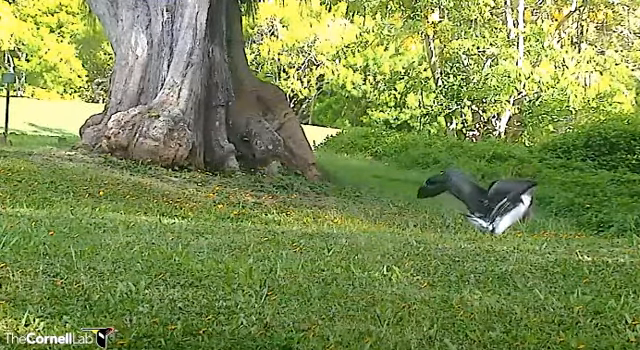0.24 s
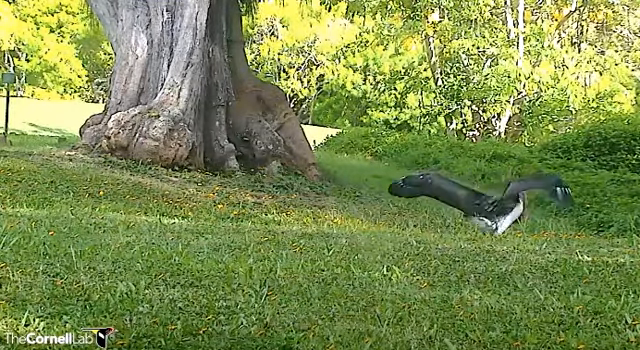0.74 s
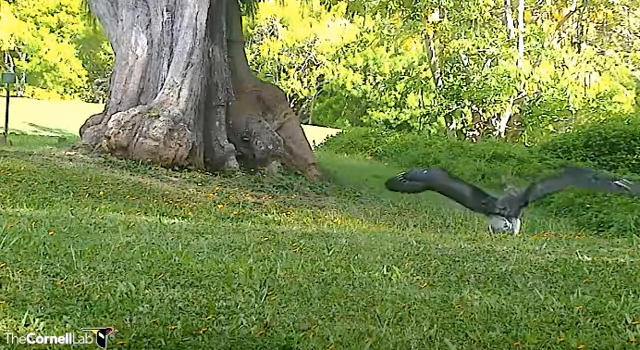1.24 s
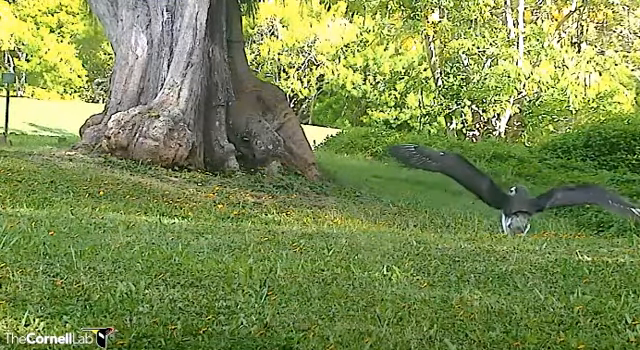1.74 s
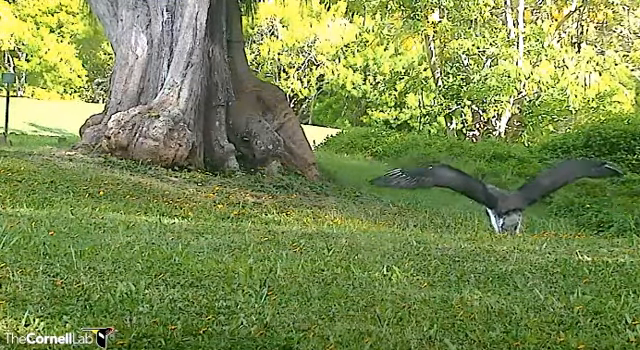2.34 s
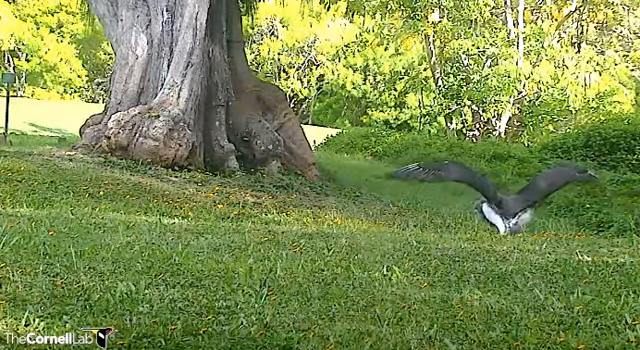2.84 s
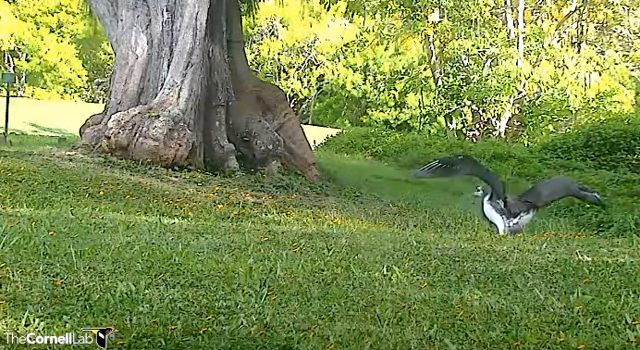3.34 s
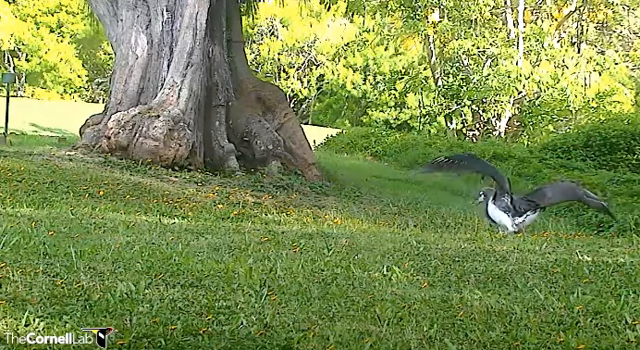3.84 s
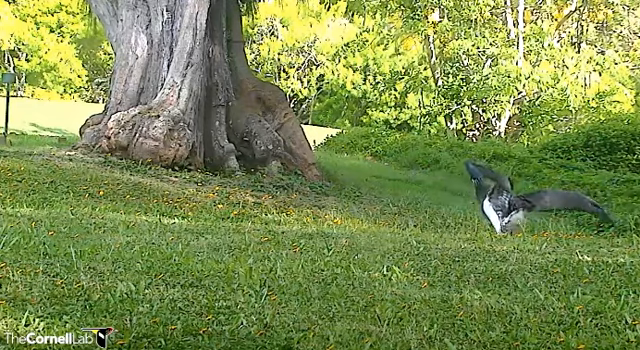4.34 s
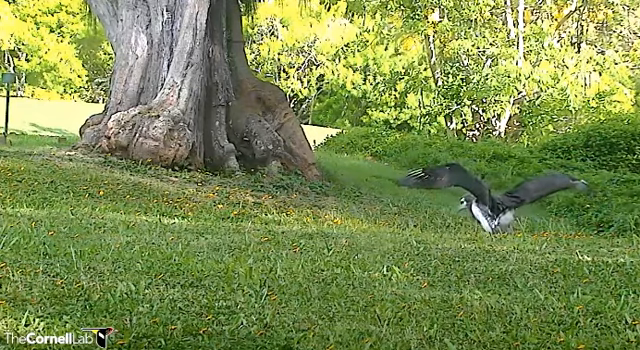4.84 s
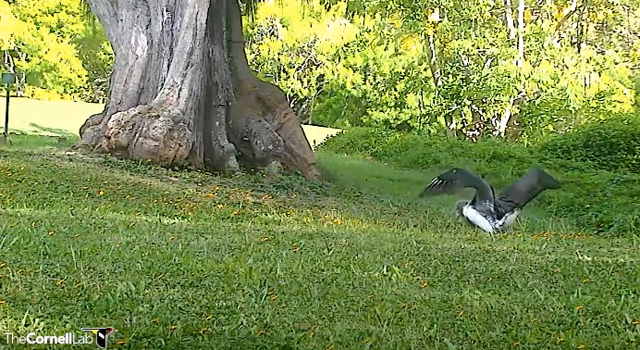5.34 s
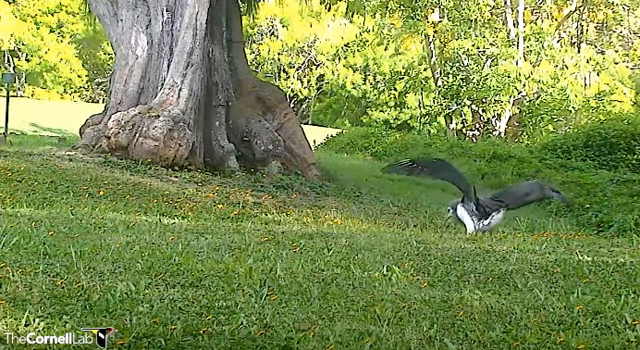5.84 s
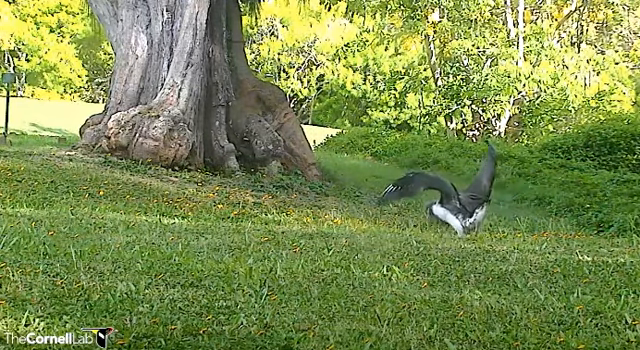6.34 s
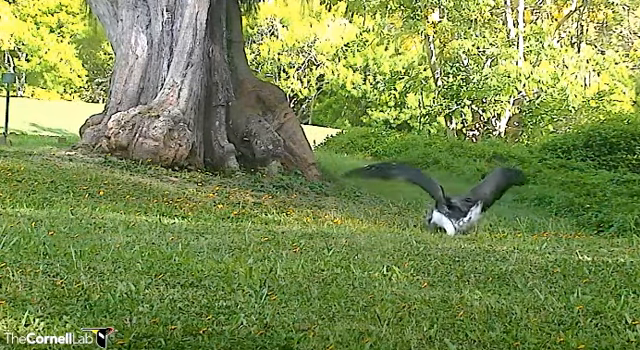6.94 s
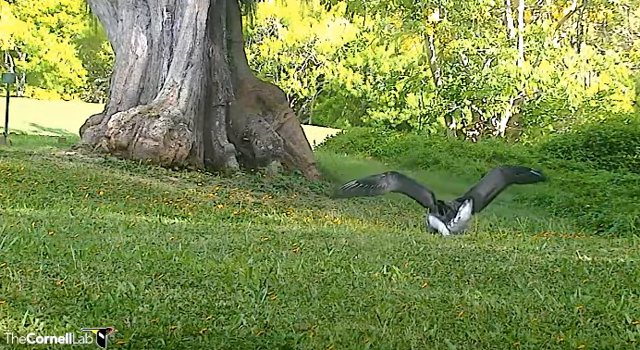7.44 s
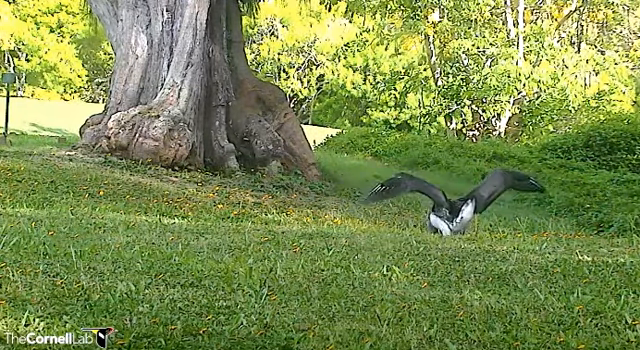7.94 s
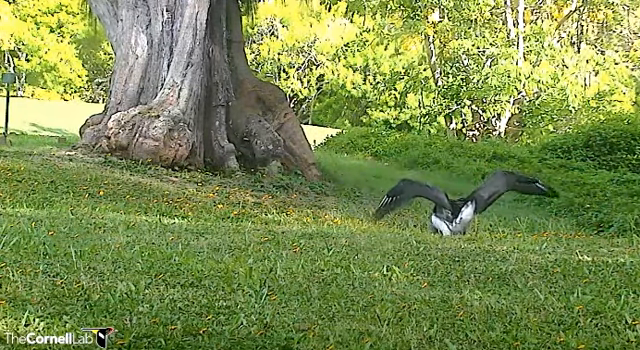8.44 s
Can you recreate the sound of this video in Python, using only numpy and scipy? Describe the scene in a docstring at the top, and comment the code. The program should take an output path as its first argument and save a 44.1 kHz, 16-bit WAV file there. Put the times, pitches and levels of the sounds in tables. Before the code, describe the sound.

A young seabird's wings swish and thump softly on a lawn amid constant insect-like hiss, framed by two short, sinking trilled hoots.

```python
"""Over a steady outdoor hiss and a faint low hum, a bird hoots at once and again near the end: each call
is a short broken note (gliding tones), then a long trill (a throbbing tone) that sinks at the end.
In between, a young albatross exercises its wings on a lawn: soft swishes and rumbles (swelling noise)
and a few low thumps (brief bell-shaped tone bursts), with thin raspy peeps (roughened gliding tones)."""
import sys
import numpy as np
from scipy import signal
from scipy.fft import rfft, irfft
from scipy.io import wavfile
from scipy.ndimage import uniform_filter1d

SR = 44100
rng = np.random.default_rng(int(sys.argv[2]) if len(sys.argv) > 2 else 0)


def to_wav(sig):
    """Store sig (one row per channel, or 1-D mono) as 16-bit WAV at the path in sys.argv[1].

    Samples outside -1..1 are clipped; the rate is SR.
    """
    pcm = np.clip(np.atleast_2d(sig), -1, 1) * 32767
    pcm = np.round(pcm).astype(np.int16)
    wavfile.write(sys.argv[1], SR, pcm.T)  # frames by channels


N = 383229
TIME_S = np.arange(N) / SR

# calls: hoot_crest_s, hoot_level_db, trill_start_s, trill_level_db, push_after_trill_start_s
CALLS = [(.213, -58, .465, -68, 0.23), (6.643, -55.5, 6.842, -71.5, 0.25)]
# hoot steps up, breaks to its crest, drops back:
# start_from_crest_s, length_s, first_hz, last_hz, level_re_crest_db, roughness_0_to_1
HOOT_NOTES = [(-.08, .06, 730, 835, -7, .4), (-.027, .044, 870, 838, -0.5, .2),
              (.006, .044, 764, 815, -7.5, .35)]

# trill: held pitch, one push, then sinking and fading
TRILL_S, TRILL_HZ, PITCH_WAVER_HZ = 0.517, 749, 6.9
SINK_AFTER_S, SINK_HZ_PER_S, FADE_DB_PER_S = 0.315, 760, 41
TRILL_ATTACK_S, TRILL_RELEASE_S = 0.035, 0.064
PUSH_DB, PUSH_HALF_S = 5.5, 0.058
# throbs ring the throat; jitter is in throb periods
THROB_PER_S, THROB_JITTER, THROB_HALF_S = 54, 0.28, 0.0037
THROB_DB, THROB_SPREAD_DB, THROAT_HZ = 5.5, 3, 800

# raspy whistles, level before taper and quiver:
# start_s, length_s, first_hz, last_hz, level_db, roughness_0_to_1
PEEP_NOTES = [(2.480, 0.022, 3230, 3420, -45, .4), (3.073, .027, 3350, 3230, -37.5, 0.2),
              (4.170, 0.051, 2900, 2880, -46.5, .54), (4.2, 0.062, 3500, 3350, -49.5, 0.65),
              (5.375, 0.05, 2980, 3030, -43.5, .56), (5.412, 0.044, 3170, 3360, -41.5, 0.54),
              (5.51, 0.091, 2637, 2760, -43, .45), (5.795, 0.057, 2880, 2960, -47, 0.2),
              (5.912, 0.092, 2607, 2572, -42, 0.37), (5.942, 0.017, 2960, 2920, -42, 0.4),
              (6.268, 0.029, 2960, 2940, -49, 0.2), (6.385, 0.096, 2556, 2517, -43.5, 0.37)]

# feather swishes: middle_s, half_length_s, level_db
SWISH_SWELLS = [(2.56, 0.084, -52), (2.9, 0.073, -54.5), (3.13, 0.12, -54), (3.58, 0.16, -53),
                (3.94, 0.035, -52), (4.24, 0.086, -56.5), (4.48, 0.032, -50.5), (5.41, 0.076, -53),
                (5.58, 0.062, -53.5), (5.83, 0.15, -52), (5.95, 0.036, -53.5), (6.3, .05, -56)]
# dull pushes of air: middle_s, half_length_s, pitch_hz, peak_db
THUMP_PULSES = [(0.745, .012, 75, -74), (1.614, 0.0063, 130, -69), (2.172, .009, 90, -78),
                (4.835, .0069, 112, -62.5), (5.0077, 0.0049, 110, -39.5), (5.018, 0.006, 115, -43.5),
                (5.024, .0034, 203, -47.5), (5.034, .0053, 110, -49), (5.096, 0.0042, 130, -48),
                (5.153, 0.0039, 108, -45.5), (5.57, .013, 95, -69), (5.623, 0.0049, 160, -59),
                (5.64, .011, 116, -48.5), (6.072, 0.0062, 110, -60.5)]
# soft low buffets of air: middle_s, half_length_s, level_db
BUFFET_SWELLS = [(.75, 0.17, -86), (1.7, .084, -85), (1.93, .024, -84), (5.06, .075, -66.5),
                 (5.6, .064, -76), (8.37, 0.06, -85)]

# background spectra (relative shape): frequency_hz, density_db_per_hz
HISS_SPECTRUM = [(1000, -54.5), (1700, -26.5), (1930, -20.5), (2090, -8.5), (2170, -5), (2510, -4.5),
                 (2860, 1), (3100, -1.5), (3390, -0.5), (3900, -5.5), (4330, -3), (4490, -6), (4870, -17),
                 (5310, -24.5), (6900, -40.5), (11700, -120)]
TOP_SPECTRUM = [(5500, 8.5), (6100, 9), (6450, 21.5), (6800, 2), (7500, 7.5), (7950, 9.5), (8450, 4),
                (9000, 10), (9350, 5), (9800, 8.5), (10200, 5), (12000, 0.5), (16000, 0)]  # faint top of the hiss
LOW_AIR_SPECTRUM = [(20, -14.5), (35, -12), (55, -13.5), (90, -7), (150, -1), (200, -3.5), (260, 0.5),
                    (400, -7.5), (560, -8.5), (700, -4), (800, 3.5), (920, 0), (1150, 10.5), (1330, 13),
                    (1550, 3), (1800, -3)]
HISS_DB, TOP_DB, LOW_AIR_DB = -50, -84, -70  # rms
HUM_HZ, HUM_DB = 119.8, -81
EDGE_HZ = 15750  # recorder's upper band limit


def gain_of(db):
    """Decibels to amplitude."""
    return 10 ** (np.asarray(db) / 20)


def evened(x):
    """Scales to an rms of one."""
    return x / np.sqrt(np.mean(x ** 2) + 1e-20)


def bell(t_s, half_s):
    """Gaussian bump with a peak of one, its far tails held at a negligible floor."""
    return np.exp(-np.minimum((t_s / half_s) ** 2, 50))


def add(mix, start_s, sound):
    """Mixes a sound in at its start time."""
    part = mix[max(round(start_s * SR), 0):][:len(sound)]
    part += sound[:len(part)]


def coloured(points):
    """Noise of rms one with the given spectrum, falling 56 dB per octave beyond its ends."""
    hz, db = np.transpose(points)
    octave = np.log2(np.fft.rfftfreq(N, 1 / SR) + 1)
    knots = np.log2(hz)
    outside = abs(octave - np.clip(octave, knots[0], knots[-1]))
    shape = gain_of(np.interp(octave, knots, db) - 56 * outside)
    return evened(irfft(rfft(rng.standard_normal(N)) * shape, N))


def waver(rate_hz, size):
    """Smooth random drift of about rms one, mostly slower than the rate."""
    padded = size + SR
    slow = 1 / (1 + (np.fft.rfftfreq(padded, 1 / SR) / rate_hz) ** 4)
    return evened(irfft(rfft(rng.standard_normal(padded)) * slow, padded))[:size]


def swells(rows):
    """Bell-shaped rises and falls, summed in power."""
    power = sum(gain_of(2 * db) * bell(TIME_S - middle_s, half_s) for middle_s, half_s, db in rows)
    return np.sqrt(power)


def syllables(rows, rasp_hz, taper):
    """Short gliding whistles; roughness shakes their strength and phase."""
    out = np.zeros(N)
    rasp = (waver(rasp_hz, N) + 1j * waver(rasp_hz, N)) / np.sqrt(2)
    for start_s, length_s, first_hz, last_hz, level_db, rough in rows:
        size = round(length_s * SR)
        rough = np.clip(rough, 0, 1)
        glide_hz = np.linspace(first_hz, last_hz, size)
        carrier = np.exp(2j * np.pi * np.cumsum(glide_hz) / SR)
        shaken = np.sqrt(1 - rough ** 2) + rough * rasp[round(start_s * SR):][:size]
        tone = evened((carrier * shaken).real)
        add(out, start_s, gain_of(level_db) * tone * signal.windows.tukey(size, taper))
    return out


def trill(level_db, push_s, flutter=0.86, rough=0.65, slack_hz=85):
    """Hoarse tone that swells, fades and sinks; uneven throbs ring the throat until it slackens."""
    t = np.arange(0, TRILL_S, 1 / SR)
    after_hold_s = np.maximum(t - SINK_AFTER_S, 0)
    sunk_hz = SINK_HZ_PER_S * after_hold_s
    pitch_hz = TRILL_HZ - sunk_hz + PITCH_WAVER_HZ * waver(25, len(t))
    phase = 2 * np.pi * np.cumsum(pitch_hz) / SR
    tension = np.clip(1 - sunk_hz / slack_hz, 0, 1)

    push_db = PUSH_DB * np.exp(-((t - push_s) / PUSH_HALF_S) ** 2)
    effort_db = level_db + push_db - FADE_DB_PER_S * after_hold_s
    ends = np.clip(np.minimum(t / TRILL_ATTACK_S, (TRILL_S - t) / TRILL_RELEASE_S), 0, 1)

    shake = np.maximum(tension, 0.35)  # some hoarseness stays once slack
    tone = (1 + shake * flutter * np.tanh(waver(70, len(t)))) * np.sin(phase)
    tone += shake * rough * waver(60, len(t)) * np.cos(2 * np.pi * THROAT_HZ * t)
    chances = rng.uniform(-1.16, 1, size=(40, 2)) * np.sqrt(3)
    for k, (slip, strength) in enumerate(chances):
        throb_s = (k + THROB_JITTER * slip) / THROB_PER_S
        # each ring starts from the tone's phase at the throb
        ring = np.sin(np.interp(throb_s, t, phase) + 2 * np.pi * THROAT_HZ * (t - throb_s))
        throb_gain = gain_of(THROB_DB + THROB_SPREAD_DB * strength)
        tone += throb_gain * tension * bell(t - throb_s, THROB_HALF_S) * ring
    return gain_of(effort_db) * ends * tone


def hoots(breath_db=-17, echo_db=-16, t60_s=0.4):
    """Both calls, rounded by the throat, with an airy edge and faint scattered echoes from the trees."""
    notes = []
    for crest_s, hoot_db, *_ in CALLS:
        for offset_s, length_s, first_hz, last_hz, db, rough in HOOT_NOTES:
            notes.append((crest_s + offset_s, length_s, first_hz, last_hz, hoot_db + db, rough))
    voice = syllables(notes, rasp_hz=90, taper=0.9)
    for _, _, start_s, trill_db, push_s in CALLS:
        add(voice, start_s, trill(trill_db, push_s))
    throat = signal.butter(2, [600, 980], "band", fs=SR, output="sos")
    voice = signal.sosfiltfilt(throat, voice)

    effort = np.sqrt(abs(uniform_filter1d(voice ** 2, size=1500)))  # rms over 34 ms
    breath = coloured([(480, -16), (650, 2.5), (850, -3.0), (950, -6)])
    voice = voice + gain_of(breath_db) * effort * breath

    t = TIME_S[:SR // 2]
    tail = rng.standard_normal(len(t)) * gain_of(-60 * t / t60_s)
    echoes = signal.fftconvolve(voice, tail / np.linalg.norm(tail))[:N]
    return voice + gain_of(echo_db) * echoes


def peeps(quiver=0.43, quiver_hz=70):
    """Thin raspy whistles: rough gliding tones whose strength quivers."""
    whistles = syllables(PEEP_NOTES, rasp_hz=200, taper=0.55)
    return whistles * (1 + quiver * np.tanh(waver(quiver_hz, N)))


def wings():
    """Feathers swish; pushes of air give dull thumps of a cycle or two and soft rumbles."""
    swish_noise = coloured([(2200, -17.5), (2650, 0.5), (2950, -2.5),
                            (3400, 1), (3750, -15.5), (4700, -21.5)])
    swish = swells(SWISH_SWELLS) * swish_noise
    rumble = swells(BUFFET_SWELLS) * coloured([(25, -25), (70, -1), (130, -7), (300, -18)])
    thumps = np.zeros(N)
    t = TIME_S[:SR // 5] - 0.1  # zero at the middle of the thump
    for middle_s, half_s, pitch_hz, peak_db in THUMP_PULSES:
        pulse = np.exp(-(t / half_s) ** 2) * np.cos(2 * np.pi * pitch_hz * t)
        add(thumps, middle_s + t[0], gain_of(peak_db) * pulse)
    return swish + rumble + thumps


def background():
    """Shaped noise for even hiss and low air; a sine for a distant machine's steady hum."""
    hiss = gain_of(HISS_DB + 0.15 * waver(5.2, N)) * coloured(HISS_SPECTRUM)
    top = gain_of(TOP_DB) * coloured(TOP_SPECTRUM)
    low_air = gain_of(LOW_AIR_DB) * coloured(LOW_AIR_SPECTRUM)
    hum = gain_of(HUM_DB) * np.sqrt(2) * np.sin(2 * np.pi * HUM_HZ * TIME_S)
    return hiss + top + low_air + hum


def scene():
    """Everything at one microphone."""
    return (hoots() + peeps() + wings() + background())[None]


def record(dry):
    """The recorder's band limit: a linear-phase low-pass."""
    lowpass = signal.firwin(511, EDGE_HZ, window=("kaiser", 9), fs=SR)
    return signal.oaconvolve(dry, lowpass[None], "same")


dry = scene()
out = record(dry)
to_wav(out)
```